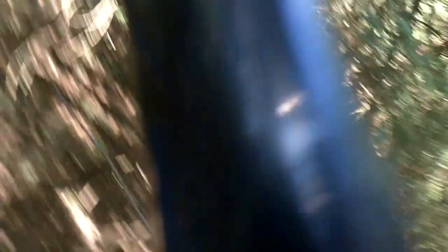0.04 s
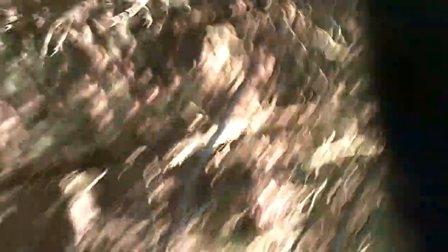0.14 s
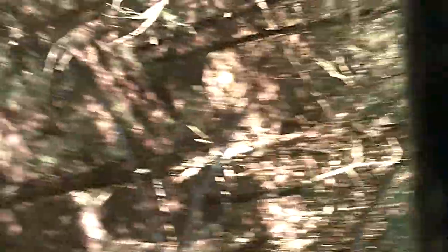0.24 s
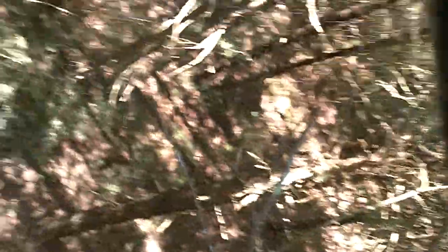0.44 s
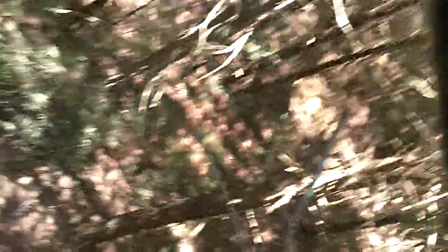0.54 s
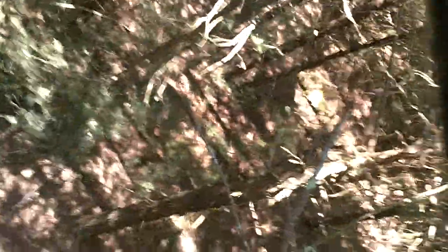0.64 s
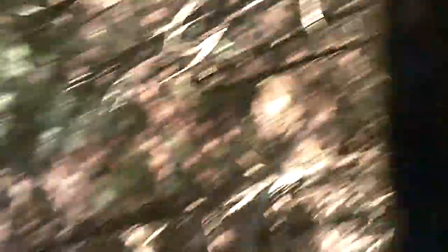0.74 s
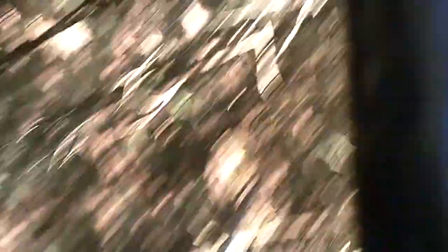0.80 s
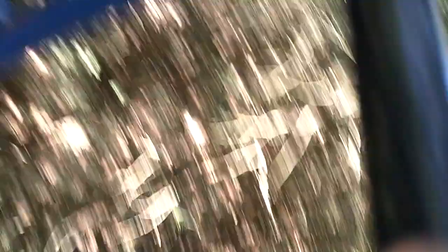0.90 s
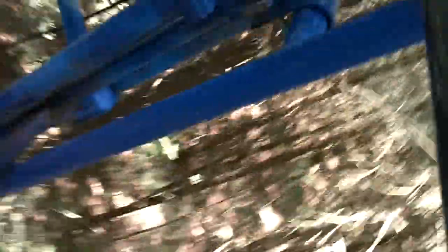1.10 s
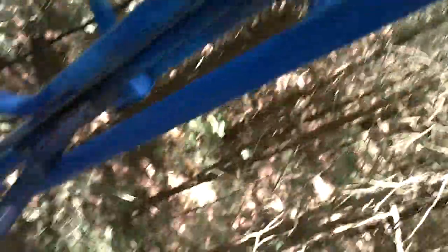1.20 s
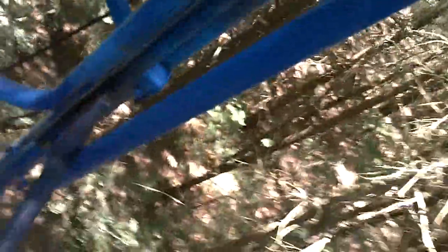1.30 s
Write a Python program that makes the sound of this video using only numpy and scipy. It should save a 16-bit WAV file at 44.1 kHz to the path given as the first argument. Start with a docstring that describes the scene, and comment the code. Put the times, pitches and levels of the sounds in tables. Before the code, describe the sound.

A sharp clack on a metal frame, ringing faintly, with soft knocks and handling rumble.

```python
"""Clack on a steel frame in a wood

A hand-held microphone is swung about beside a painted steel frame in a quiet wood.
A dull bump on its body is followed by one hard clack that rebounds softly and leaves the steel
ringing faintly. Small ticks, soft knocks and scuffs surround it, over handling rumble and low hiss."""
import sys
import numpy as np
from scipy import signal
from scipy.fft import rfft, irfft
from scipy.io import wavfile
from scipy.ndimage import uniform_filter1d

SR = 44100
rng = np.random.default_rng(int(sys.argv[2]) if len(sys.argv) > 2 else 0)


def store_pcm(level_fs):
    """Save levels as 16-bit WAV."""
    pcm = np.round(np.clip(level_fs, -1, 1) * 32767).astype(np.int16)
    wavfile.write(sys.argv[1], SR, np.atleast_2d(pcm).T)


N = 59535
TIME = np.arange(N) / SR


def from_db(db):
    """Decibels to gain."""
    return 10 ** (np.asarray(db) / 20)


def level_curve(points):
    """Gain ride through (time [s], level [dB]) points."""
    return from_db(np.interp(TIME, *np.transpose(points)))


def noise(spectrum):
    """Noise of rms 1 with the given colour, rolling off below its lowest frequency."""
    hz, db = np.transpose(spectrum)
    bins = np.maximum(np.fft.rfftfreq(N, 1 / SR), 1)
    colour = from_db(np.interp(np.log(bins), np.log(hz), db))
    roll_off = np.minimum(bins / hz[0], 1) ** 2
    x = irfft(rfft(rng.standard_normal(N)) * colour * roll_off, N)
    return x / x.std()


def decay(start, t60):
    """Sudden start, then a fall of 60 dB every t60 seconds."""
    return (TIME >= start) * from_db(-60 * np.maximum(TIME - start, 0) / t60)


def swell(start, attack, t60):
    """Straight rise, exponential tail."""
    rise = np.clip((TIME - start) / attack, 0, 1)
    return rise * np.where(TIME < start + attack, 1, decay(start + attack, t60))


def ring(start, hz, t60):
    """One damped sine."""
    return decay(start, t60) * np.sin(2 * np.pi * hz * (TIME - start))


def strike(start, modes):
    """All modes of a body, set ringing at once."""
    return sum(from_db(db) * ring(start, hz, t60) for hz, db, t60 in modes)


def filtered(x, hz, kind, order=2):
    """Butterworth filter."""
    sections = signal.butter(order, hz, kind, fs=SR, output="sos")
    return signal.sosfilt(sections, x + 1e-18)


def rubbing(strokes, spectrum, grain_db):
    """Grainy friction noise that swells and dies with each stroke, dulled by that stroke's cutoff."""
    grain = uniform_filter1d(rng.standard_normal(N), size=90)
    friction = noise(spectrum)
    out = sum(from_db(db) * swell(start, attack, t60) * filtered(friction, cutoff, "low", order=5)
              for start, db, attack, t60, cutoff in strokes)
    return out * from_db(grain_db * grain / grain.std())


def outdoor_hiss():
    """A low bed of outdoor air that sinks a little midway."""
    # colour of the air: (frequency [Hz], relative density [dB])
    colour = [(100, 6), (280, 0), (500, -6), (1000, -8.5), (1900, -11.5), (4000, -13.5), (4900, -14),
              (6300, -24), (8500, -26), (10000, -26), (14500, -30)]
    # its gain ride: (time [s], relative level [dB])
    ride = [(0, -62), (.3, -60), (.49, -62.5), (.62, -66.5), (.8, -65.5), (1.05, -65.5), (1.35, -61.5)]
    return from_db(5) * level_curve(ride) * noise(colour)


def handling_rumble():
    """The moving hand sends deep rumble into the microphone."""
    # colour of the rumble: (frequency [Hz], relative density [dB])
    colour = [(17, -21), (24, 15.5), (32, -14.5), (55, -7), (110, -30.5), (250, -51.5)]
    # its gain ride: (time [s], level [dB])
    ride = [(0, -51), (.15, -47), (.3, -42), (.45, -47), (.65, -52), (.85, -55), (.97, -50), (1.15, -48),
            (1.35, -52)]
    return level_curve(ride) * noise(colour)


def rustles():
    """A soft rustle of movement swells towards the end."""
    # movements: (time [s], level [dB], attack [s], t60 [s], cutoff [Hz])
    strokes = [(.82, -59, 0.081, 0.85, 5140), (1.0, -57, .15, 2.6, 3950)]
    # mid-heavy friction: (frequency [Hz], relative density [dB])
    colour = [(300, 1.5), (650, -1), (900, -11.5), (1300, -2.5), (1550, 2), (2000, -6.5), (3000, -21),
              (8000, -32)]
    return rubbing(strokes, colour, grain_db=1.2)


def brushes():
    """Light brushing along the steel gives two airy wisps."""
    # touches: (time [s], level [dB], attack [s], t60 [s], cutoff [Hz])
    strokes = [(.43, -60.5, 0.054, 0.081, 8200), (.94, -55.5, 0.016, 0.072, 15300)]
    # bright friction: (frequency [Hz], relative density [dB])
    colour = [(1500, -6), (4000, 2.5), (7000, -7), (10000, -6), (15000, -8)]
    return rubbing(strokes, colour, grain_db=2.0)


def scuffs():
    """Abrupt rubs; the second, a scrape just before the clack, rings briefly."""
    # rubs: (time [s], level [dB], attack [s], t60 [s], cutoff [Hz])
    strokes = [(0, -50, 0.00069, 0.41, 5940), (.2705, -40.5, 0.0014, 0.18, 4500),
               (1.136, -48, 0.00076, 0.18, 4460), (1.3, -39.5, 0.0053, 0.55, 15000)]
    # broad friction: (frequency [Hz], relative density [dB])
    colour = [(180, -60), (300, -8.5), (1230, -8), (2100, -5.5), (2730, -8), (3790, -8), (7060, -24),
              (7670, -63), (9490, -26.5), (15000, -40)]
    # ring of the scrape: (frequency [Hz], level [dB], t60 [s])
    scrape_modes = [(984, -48, 0.37), (1470, -41, 0.11), (2914, -41.5, 0.21), (3820, -58, 0.048),
                    (4700, -61, 0.093)]
    scrape_start = strokes[1][0]
    return rubbing(strokes, colour, grain_db=0.5) + strike(scrape_start, scrape_modes)


def ticks():
    """Tiny dry snaps: a broad click with one band standing out."""
    # snaps: (time [s], peak [dB], band centre [Hz], t60 [s], broad click mix [dB])
    snaps = [(.2388, -25.5, 4200, 0.022, -11), (0.2462, -35, 6200, .018, -9),
             (0.2555, -36.5, 4440, 0.0028, -12), (0.3129, -29, 5020, 0.069, 1),
             (0.8875, -32, 3820, 0.0041, -19), (1.2841, -32.5, 6000, 0.0061, -9)]
    edge_ratio = 1.288
    out = 0
    for start, db, hz, t60, click_db in snaps:
        burst = rng.standard_normal(N) * decay(start, t60)
        band = filtered(burst, [hz / edge_ratio, hz * edge_ratio], "band")
        snap = band + from_db(click_db) * burst
        out += from_db(db) * snap / np.abs(snap).max()
    return out


def lingering_ring():
    """A faint metal ring is already dying away at the start."""
    # fading partials: (frequency [Hz], level [dB], t60 [s])
    modes = [(490, -61, .5), (1760, -69, .6), (4510, -59, .55), (4988, -63, .7)]
    return strike(0, modes)


def frame_drones():
    """The shaken frame hums briefly on single low notes."""
    # hums: (time [s], level [dB], attack [s], t60 [s], pitch [Hz])
    hums = [(.25, -43, 0.0214, 0.66, 155), (0.464, -42.5, 0.0086, 0.19, 150.6),
            (1.195, -51.5, 0.049, 0.31, 274)]
    return sum(from_db(db) * swell(start, attack, t60) * np.sin(2 * np.pi * hz * TIME)
               for start, db, attack, t60, hz in hums)


def frame_knocks():
    """Soft blows reach only the frame's low modes."""
    # blows: (time [s], level [dB])
    blows = [(0.133, -37), (0.154, -49), (1.069, -30.5), (1.09, -60), (1.189, -36.5), (1.23, -42.5)]
    # low modes of the frame: (frequency [Hz], relative level [dB], t60 [s])
    modes = [(148, -8.5, 0.057), (209, -16.5, 0.2), (265.4, -19, .3), (314.8, -17.5, 0.35),
             (450, -24, 0.047)]
    return sum(from_db(db) * strike(start, modes) for start, db in blows)


def microphone_bumps():
    """Each bump rocks the microphone for a few low cycles; the casing clunks under the big one."""
    # bumps on the body: (time [s], level [dB], pitch [Hz], t60 [s])
    thumps = [(.131, -31, 101, .16), (0.2351, -3, 75.9, 0.055), (0.254, -12, 35.85, 0.064),
              (0.304, -27, 63.7, 0.15), (0.358, -35.5, 65.4, 0.31), (1.23, -42, 85, 0.049),
              (1.289, -38, 60.6, 0.1)]
    # resonances of the casing: (frequency [Hz], level [dB], t60 [s])
    casing = [(695, -16.5, 0.021), (1010, -25, 0.0092), (1370, -33, 0.014)]
    clunk_s, low_cut_hz, hand_cushion_hz = 0.2388, 442, 330
    rocking = sum(from_db(db) * ring(start, hz, t60) for start, db, hz, t60 in thumps)
    clunk = filtered(strike(clunk_s, casing), low_cut_hz, "high")
    return clunk + filtered(rocking, hand_cushion_hz, "low")


def clack():
    """A hard double contact and three soft, dull rebounds; the steel rings on from the first hit."""
    # contacts: (time [s], level [dB], cutoff [Hz])
    contacts = [(.3227, 0, 14000), (.3237, -8, 9000), (.3302, -12, 1100), (.3328, -21, 1000),
                (.3364, -17, 850)]
    # damped body of each contact: (frequency [Hz], relative level [dB], t60 [s])
    body_modes = [(273, -46, 0.06), (630, -19, 0.026), (838, -3.5, 0.012), (1147, -12, .009),
                  (1738, -19, 0.011), (2250, -14, 0.016), (3355, -12.5, 0.021), (3760, -8.5, .008),
                  (6140, -13.5, 0.0091), (7686, -12, 0.0062), (10430, -24.5, 0.003), (11100, -30.5, .004),
                  (13300, -13.5, .005), (13770, -19.5, 0.0042)]
    # long ring of the steel: (frequency [Hz], relative level [dB], t60 [s])
    steel_modes = [(500, -3, .25), (660, -13, .45), (1755, -10, .37), (2358, -1, .26), (3483, -20, .45),
                   (3601, -10, .27), (4086, -10, .24), (4151, -14, .3), (4510, -22, .36), (6223, -17, .42),
                   (6783, -25, .38), (9265, -16, .26), (10040, -18, .22), (10260, -21, .2)]
    # dense wash of the steel's weaker modes: (frequency [Hz], relative density [dB])
    shimmer_colour = [(150, -1), (350, 8), (650, 8.5), (1100, -9.5), (2000, 1.5), (4200, -13), (6500, -14),
                      (9500, -13), (15000, -34.5)]
    hits = 0
    for start, db, cutoff in contacts:
        crunch = decay(start, t60=0.011) * filtered(rng.standard_normal(N), hz=3700, kind="low", order=1)
        hits += from_db(db) * filtered(crunch - strike(start, body_modes), cutoff, "low")
    first_hit = contacts[0][0]
    ring_out = from_db(-38.5) * strike(first_hit, steel_modes)
    shimmer = from_db(-41.5) * decay(first_hit, t60=0.39) * noise(shimmer_colour)
    return hits + ring_out + shimmer


def scene():
    """One mix feeds both channels, the left one slightly later."""
    metal = clack() + frame_knocks() + frame_drones() + lingering_ring()
    friction = scuffs() + brushes() + rustles()
    mix = metal + friction + microphone_bumps() + ticks() + outdoor_hiss() + handling_rumble()
    left_lag_s = 2.3e-5
    delay = np.exp(-2j * np.pi * np.fft.rfftfreq(2 * N, 1 / SR) * left_lag_s)
    left = irfft(rfft(mix, 2 * N) * delay)[:N]
    return np.array([left, mix])


def record(dry):
    """The microphone port cuts narrow dips; peaks are rounded and the top is cut off."""
    # notches of the port: (frequency [Hz], width [Hz], gain at centre [dB])
    port_dips = [(2704, 800, -19.5), (5423, 1000, -46), (7970, 1900, -50.5), (11000, 487, -22)]
    clip_ceiling, top_hz = 1.1, 15400
    for hz, width_hz, db in port_dips:
        notched = signal.lfilter(*signal.iirnotch(hz, hz / width_hz, fs=SR), dry)
        dry = notched + from_db(db) * (dry - notched)
    dc_free = filtered(dry, hz=8.2, kind="high", order=1)
    rounded = clip_ceiling * np.tanh(dc_free / clip_ceiling)
    high_cut = signal.ellip(10, .2, 80, top_hz, fs=SR, output="sos")
    return signal.sosfilt(high_cut, rounded)


dry = scene()
out = record(dry)
store_pcm(out)
```